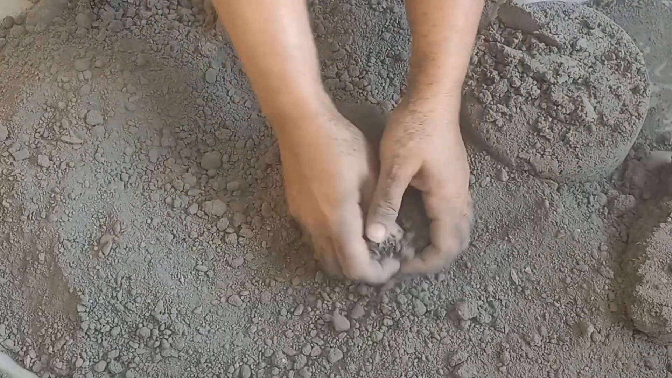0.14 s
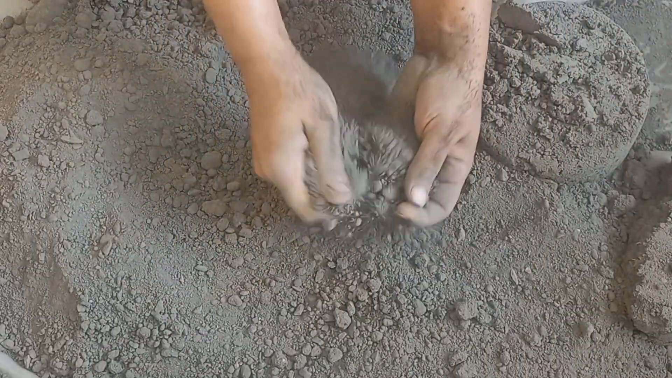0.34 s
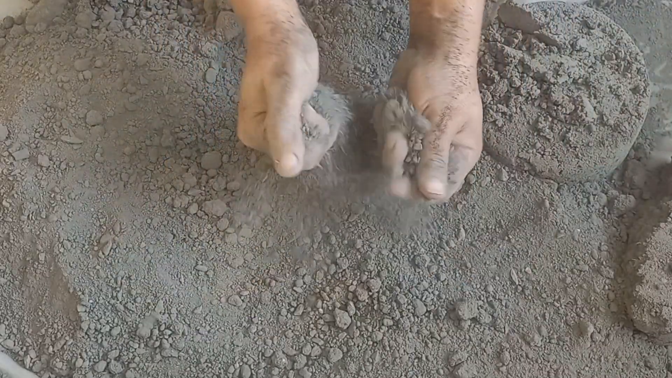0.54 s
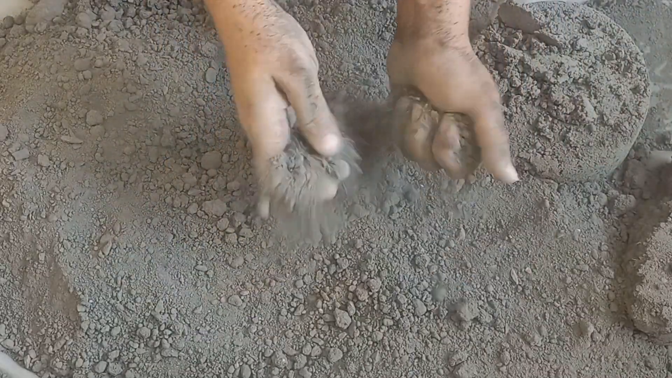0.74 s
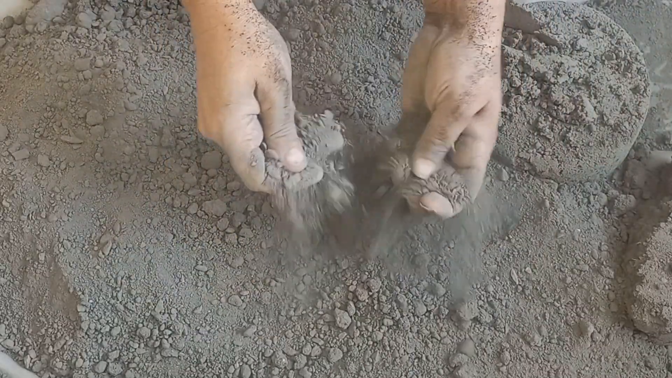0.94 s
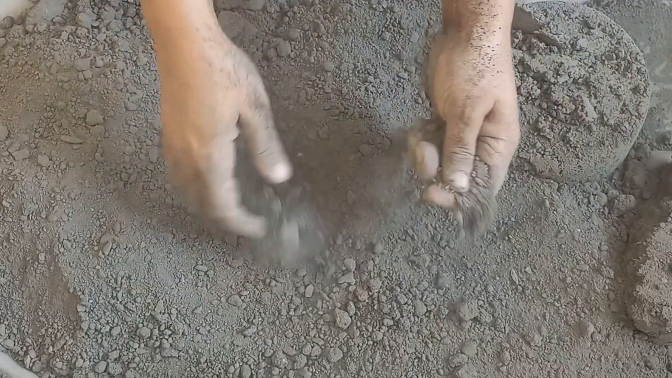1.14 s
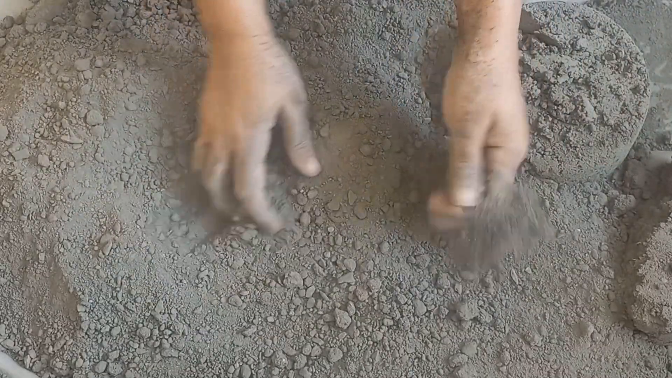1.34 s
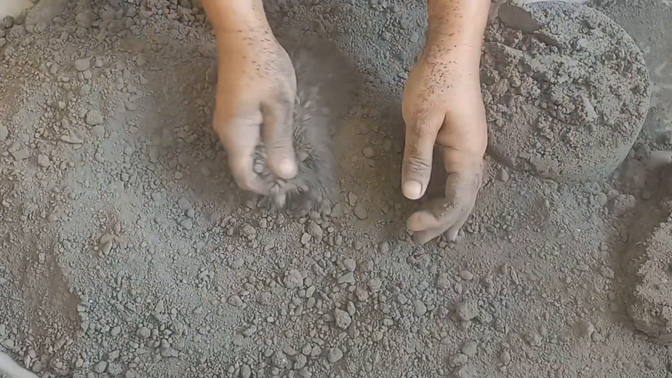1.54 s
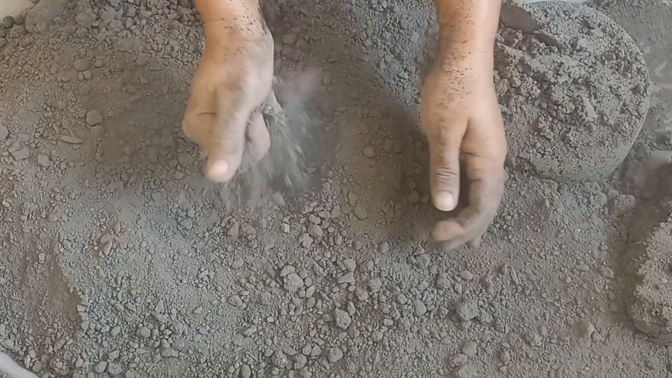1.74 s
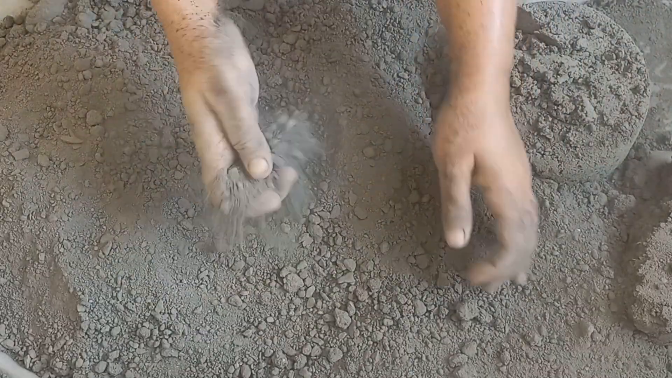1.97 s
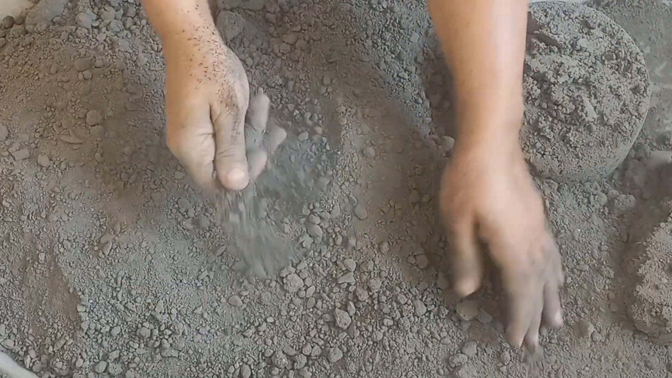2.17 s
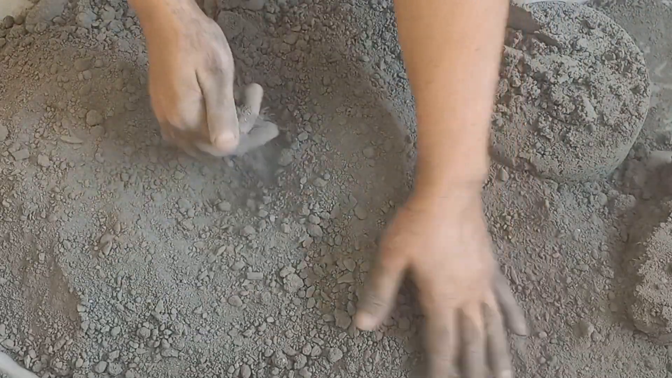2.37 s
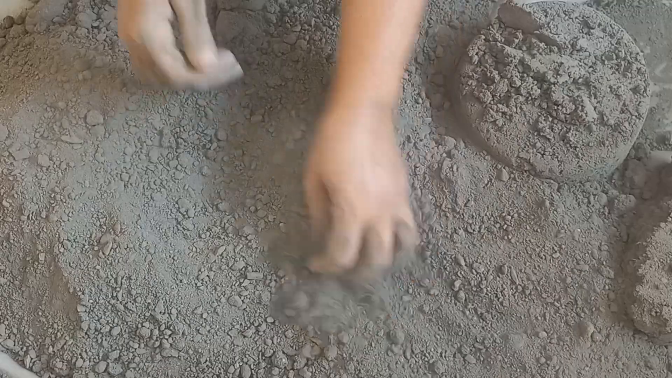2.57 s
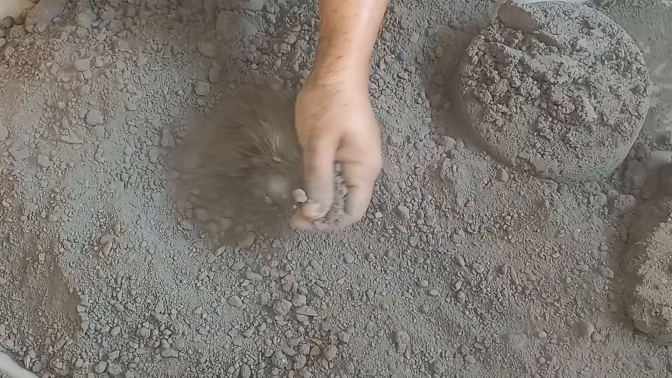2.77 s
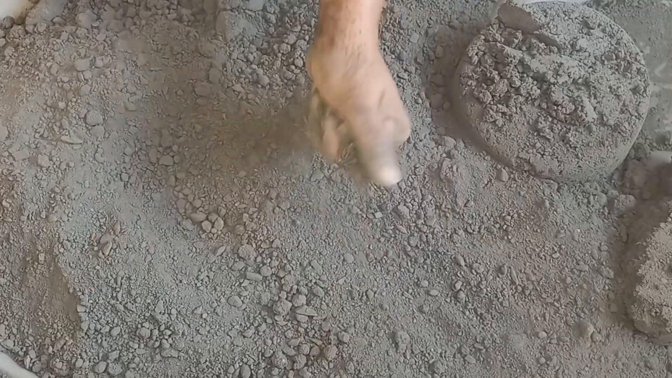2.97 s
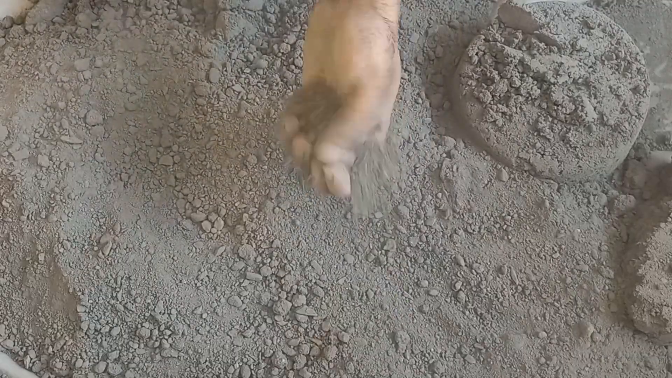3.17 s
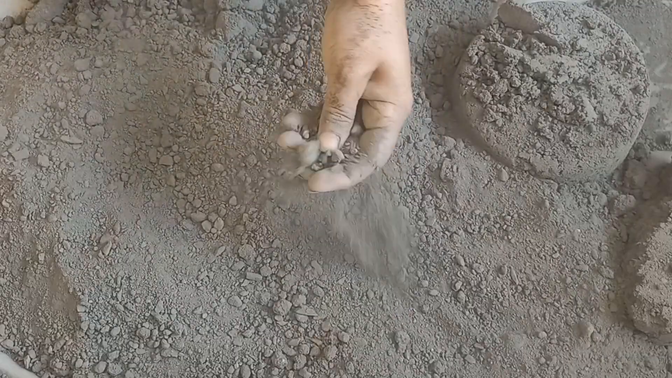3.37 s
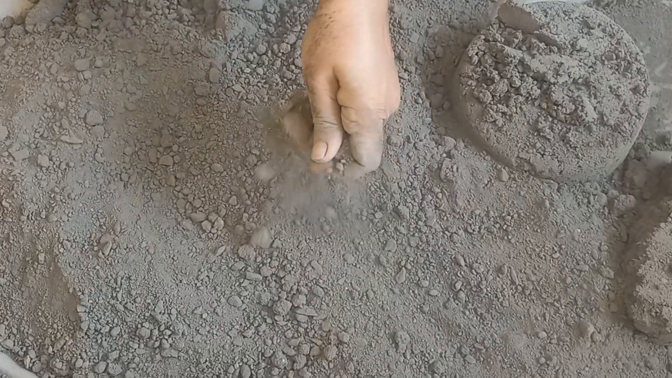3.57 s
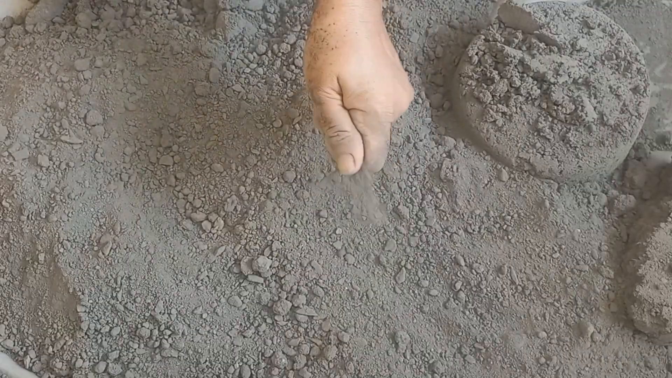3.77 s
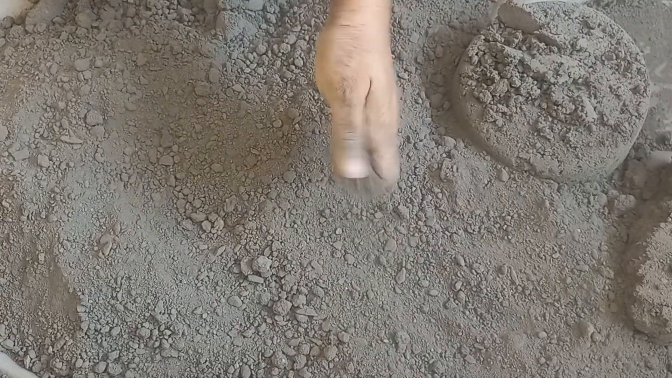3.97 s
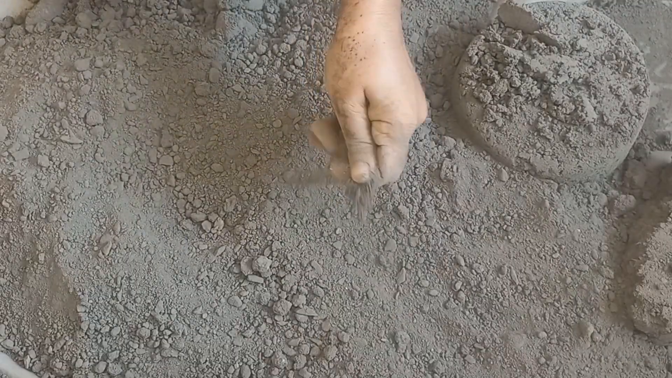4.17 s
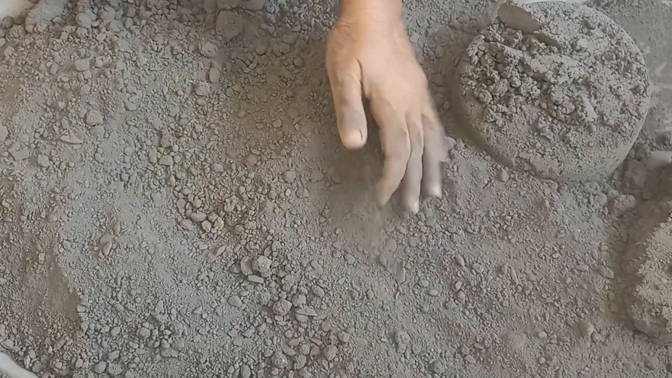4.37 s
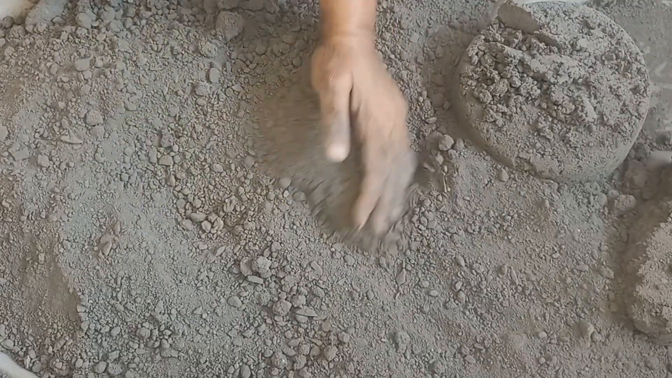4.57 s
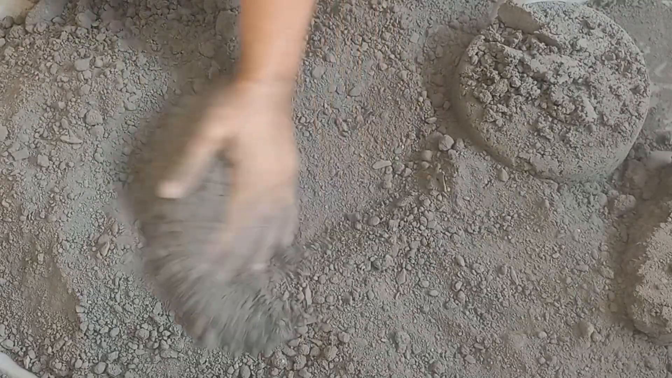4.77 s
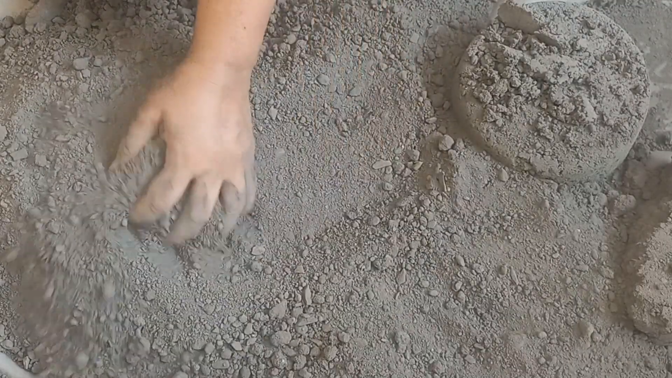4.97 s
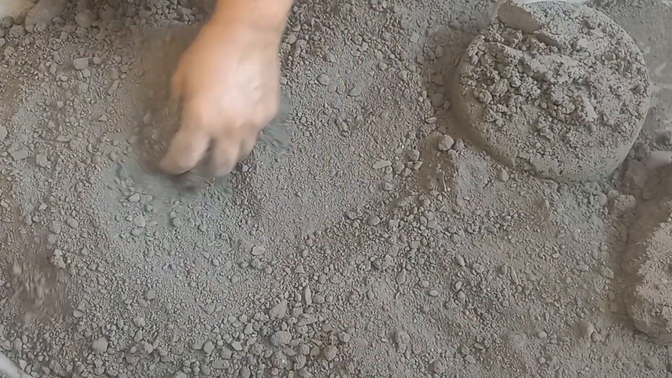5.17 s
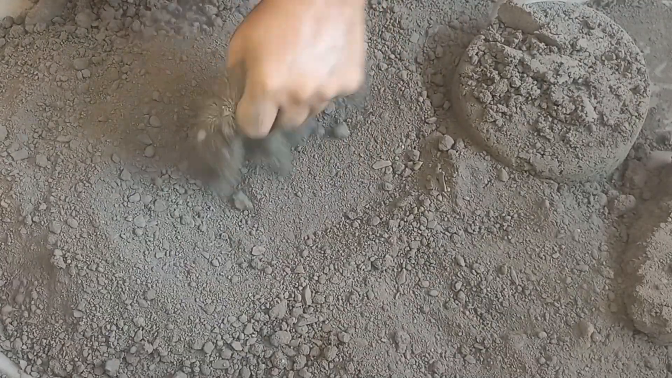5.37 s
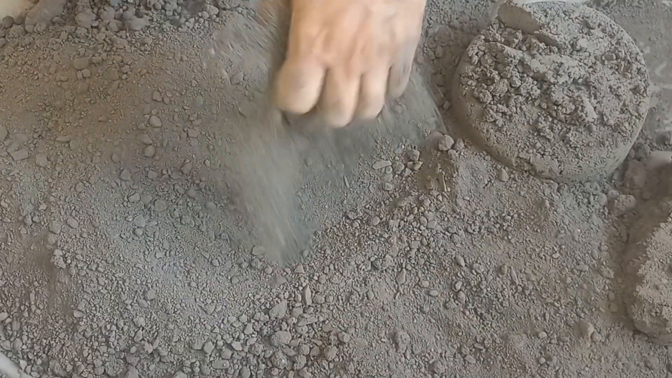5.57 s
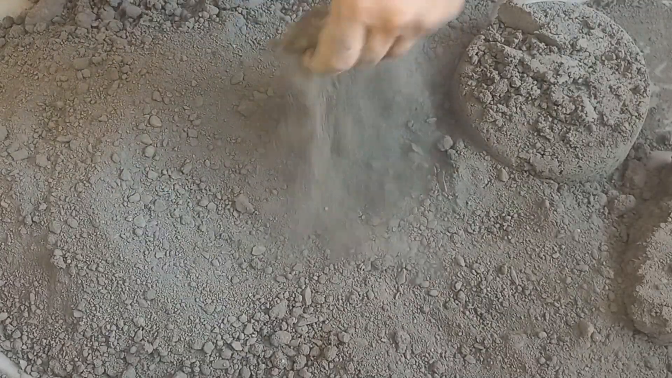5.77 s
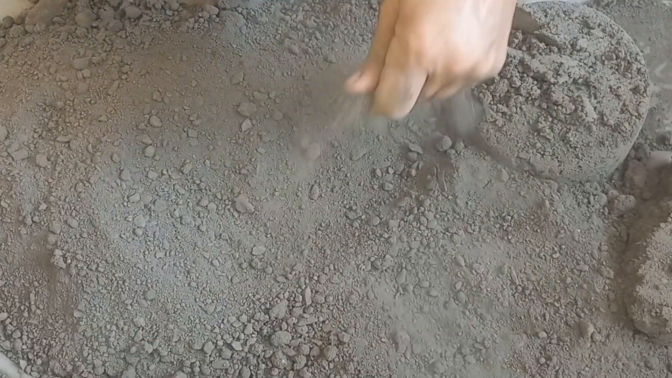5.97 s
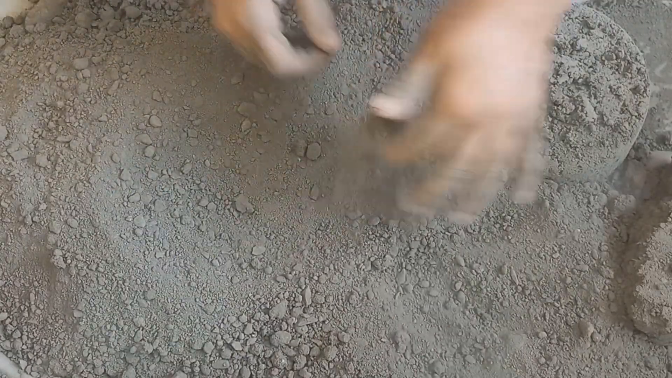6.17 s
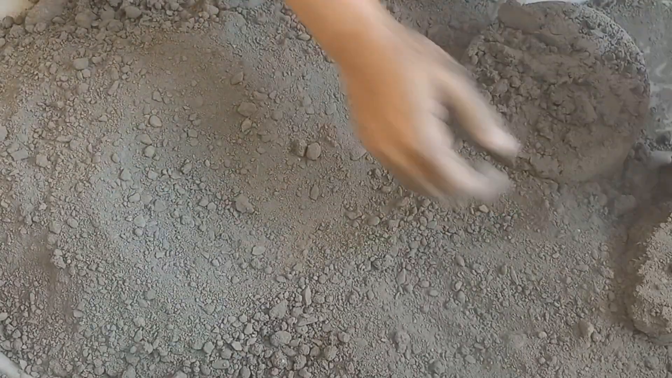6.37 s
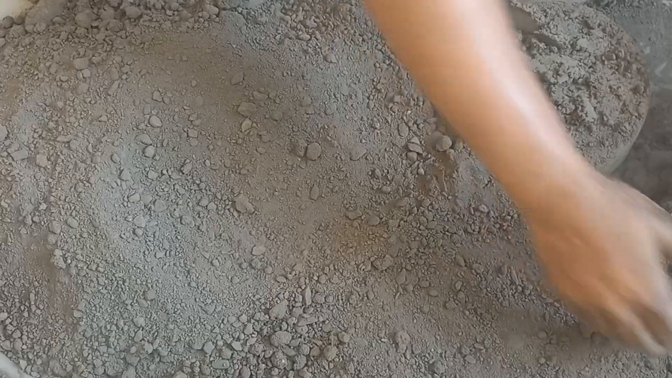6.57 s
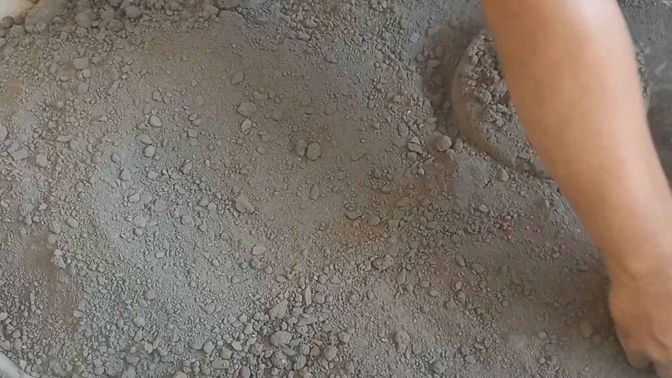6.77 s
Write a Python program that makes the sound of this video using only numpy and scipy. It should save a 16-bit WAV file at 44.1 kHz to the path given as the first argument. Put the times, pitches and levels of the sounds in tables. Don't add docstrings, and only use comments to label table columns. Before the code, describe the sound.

Bare hands dig into dry, dusty lumps with a scraping hiss, then rub and crush them, crumbs crunching in the palm, small pieces snapping and grit raining down. The middle grows thinner, with isolated crackles and squeezes. A rougher scoop with low knocks follows, then a falling handful, near quiet and a last short scrape. Close small microphone, very dry small space, faint hum and hiss.

```python
import sys
import numpy as np
from scipy import signal
from scipy.fft import rfft, irfft, next_fast_len
from scipy.io import wavfile
from scipy.ndimage import uniform_filter1d

SR = 44100
rng = np.random.default_rng(int(sys.argv[2]) if len(sys.argv) > 2 else 0)


def transcribe(signal):
    frames = np.atleast_2d(signal).T
    limited = np.clip(frames, -1, 1)
    pcm = np.round(limited * 32767).astype(np.int16)
    wavfile.write(sys.argv[1], SR, pcm)


def gain_from_decibels(decibels):
    exponent = np.asarray(decibels, float) / 20
    return 10 ** exponent


N = 301203

# frequency in Hz, level in dB per Hz.
BACKGROUND_SPECTRUM = [(20, -72), (40, -42), (60, -19), (80, -17), (130, -7), (170, -6.5), (240, -17.5),
                       (400, -18), (600, -62), (3500, -46), (3800, -37.5), (7000, -31), (15500, -35.5)]
# frequency in Hz, width of its waver in Hz, level in dB.
MAINS_HUM = (100.4, 12.4, -50.5)
# frequency in Hz, level in dB.
HUM_PARTNERS = [(78, -61), (131, -59), (201, -60)]
# frequency in Hz, gain in dB.
MICROPHONE = [(25, -45), (45, -25), (65, 0), (120, -4), (1650, 0.5), (1950, 3.5), (2350, 5), (6000, -3.5),
              (15000, -6.5)]
# frequency in Hz, side minus mid in dB.
SIDE_COLOUR = [(60, -54), (110, -42), (200, -47), (380, -21), (700, -38), (1290, -64), (2380, -48),
               (4400, -45), (8120, -34.5), (15000, -32)]

# spread of ring in octaves, cycles of ring, grains per second, size spread in dB,
# share of wide ticks from 0 to 1.
HEAP_GRAINS = (.7, 0.55, 1300, 2.2, 0.23)
LUMP_GRAINS = (.43, 1.2, 2600, 1.5, 0.32)
CRUMB_GRAINS = (.3, 2.8, 3300, 3.7, .25)
GRIT_GRAINS = (0.45, 0.48, 8000, 2.3, 0.2)
RINGS_HZ = np.geomspace(110, 18000, 30)

# peak in seconds, rise in seconds, fall in seconds, effort in dB, ring of the lumps in Hz.
SCOOPS = [(.06, 0.1, 0.12, -31.5, 885), (.18, .1, 0.07, -34.5, 850), (0.781, 0.092, 0.1, -37, 1024),
          (1.245, .015, 0.056, -43.5, 480), (1.376, 0.076, 0.13, -33, 895), (2.601, 0.15, 0.11, -32.5, 900),
          (3.02, 0.079, 0.11, -37.5, 900), (3.168, 0.044, 0.082, -46.5, 840),
          (4.622, 0.13, 0.41, -37.5, 723), (4.811, 0.18, 0.08, -32.5, 880), (5.03, 0.06, 0.28, -32.5, 1110),
          (5.139, 0.11, 0.12, -31.5, 923), (5.25, 0.081, 0.12, -41.5, 950), (5.77, 0.049, 0.08, -39.5, 800),
          (6.781, 0.058, 0.052, -37, 1330)]
# peak in seconds, rise in seconds, fall in seconds, effort in dB, lumps in the hand in dB.
RUBS = [(.03, 0.12, 0.071, -31, -6.5), (0.358, 0.059, 0.39, -30, -7.5), (.72, 1, 0.11, -32, -6.5),
        (1.07, 0.19, 0.39, -35, -7), (1.27, 0.037, 0.1, -36.5, -7), (1.69, 0.18, 0.067, -28, -7.5),
        (1.75, 0.077, 0.24, -32.5, -5.5), (2.22, 0.12, 0.12, -32, -11), (2.58, 0.17, 0.11, -31, -19),
        (2.991, 0.26, 0.15, -31, -13), (3.36, 0.069, 0.3, -40, -13), (3.5, 0.017, 0.078, -41, -23),
        (3.7, 0.22, 0.47, -39.5, -20), (3.901, 0.16, 0.083, -33.5, -22), (4.15, 0.12, 0.25, -40, -10),
        (4.262, 0.053, 0.014, -31.5, -14), (4.8, 0.15, 0.23, -35.5, -11.5), (5.03, 0.088, 0.21, -36, -4.5),
        (5.42, 0.16, 0.18, -35.5, -4), (5.765, 0.037, 0.13, -35.5, -10), (5.95, 0.088, 0.06, -36, -13),
        (6.07, 0.015, 0.13, -36, -12.5), (6.2, 0.16, 0.15, -49, 0), (6.78, 0.028, 0.052, -39, 1)]
# peak in seconds, rise in seconds, fall in seconds, effort in dB, ring in Hz.
CRUNCHES = [(0.348, 0.14, 0.25, -36, 4890), (.72, 0.35, 0.26, -50, 3400), (1.688, 0.057, 0.23, -36, 4380),
            (2.18, 0.11, 0.07, -35.5, 4100), (2.25, 0.1, 0.042, -37, 3940), (2.99, 0.11, 0.17, -40, 3350),
            (3.62, .1, .1, -58, 3500), (3.51, 0.018, 0.024, -46, 4600), (3.78, 0.019, 0.033, -47, 2840),
            (3.88, 0.26, 0.047, -62, 3670), (4.258, 0.15, .015, -46.5, 3400),
            (5.42, 0.21, 0.063, -44, 3650), (5.949, 0.017, 0.043, -41.5, 4460),
            (6.079, 0.026, 0.042, -44, 2800), (6.73, 0.045, 0.058, -53, 1920)]
# time in seconds, level in dB.
TRICKLE = [(0, -42), (.2, -45), (.92, -41.5), (1.5, -43), (2.03, -45.5), (2.38, -44), (2.8, -45.5),
           (3.25, -47), (3.5, -45), (4.0, -48.5), (4.36, -45.5), (4.5, -50), (5.6, -41.5), (5.88, -45.5),
           (6.0, -44.5), (6.27, -44), (6.36, -55.5), (6.68, -56.5), (6.83, -42)]
# time in seconds, closure from 0 to 1.
CLOSURE = [(0, 0.2), (.3, 0.67), (.8, 0.61), (1.25, 0.6), (1.55, 0.47), (2.35, 0.44), (2.5, 0), (2.8, 0.47),
           (3.1, 0), (3.4, 0.69), (4.5, 0.69), (4.6, 0.07), (5.3, 0.01), (5.5, 0.96), (5.75, 0.32),
           (5.9, 0.25), (6.35, 0.72), (6.6, 0.2)]

# time in seconds, level in dB, ring in Hz, length in ms.
SCRAPES = [(0.049, -43, 920, 15), (0.368, -39, 1370, 31), (0.546, -39, 1310, 37), (1.097, -40, 1210, 19),
           (1.264, -46, 900, 22), (1.359, -38, 950, 52), (1.396, -36, 1000, 24), (1.633, -40, 1290, 27),
           (1.656, -41, 1040, 9), (1.745, -36.5, 990, 26), (2.274, -40, 890, 11), (2.288, -42.5, 1050, 8.4),
           (2.564, -39, 815, 30), (2.591, -33, 850, 43), (2.977, -31, 900, 14), (3.021, -37, 644, 11),
           (3.063, -33.5, 860, 17), (3.62, -50, 760, 11), (3.757, -43, 1320, 10), (3.874, -45, 1360, 14),
           (4.131, -51, 1120, 17), (4.188, -45, 1360, 21), (4.244, -41, 1190, 17), (4.262, -41, 1280, 14),
           (4.561, -38, 824, 26), (4.602, -38, 776, 51), (4.784, -43, 1020, 27), (4.804, -45, 700, 34),
           (5.117, -30.5, 830, 40), (5.343, -40, 1020, 18), (5.747, -43, 740, 27), (5.78, -43, 764, 12),
           (5.805, -59, 674, 19), (5.958, -52, 1100, 11), (5.974, -51, 820, 17), (6.076, -47.5, 870, 18),
           (6.257, -40.5, 726, 8.5), (6.761, -36.5, 1420, 29), (6.773, -51, 1290, 28),
           (6.795, -42, 1310, 21)]
# time in seconds, level in dB, ring in Hz, length in ms.
GRINDS = [(.704, -38, 3420, 32), (.967, -43.5, 3480, 39), (1.699, -33, 4850, 12), (2.203, -29.5, 4240, 8.3),
          (2.222, -37, 4200, 12), (2.238, -32, 4000, 6), (1.375, -37.5, 1860, 66), (2.6, -41, 2700, 21),
          (2.971, -35, 3240, 23), (3.518, -38, 2820, 3.5), (3.783, -44, 2860, 12), (3.87, -38.5, 3100, 7.1),
          (3.914, -42, 3000, 6.6), (4.026, -60.5, 2960, 3), (4.188, -39, 3600, 15), (4.264, -43, 3160, 12),
          (4.78, -37, 3020, 21), (5.951, -39, 3450, 21), (6.804, -35, 2520, 9.2)]
# time in seconds, peak in dB, centre in Hz.
SNAPS = [(.4952, -15, 7340), (.7175, -14, 4500), (.7207, -17, 5610), (1.1633, -13, 5200),
         (1.235, -10, 4500), (1.375, -9, 7460), (1.6295, -14, 4290), (1.6997, -14, 7830),
         (2.111, -16, 7620), (2.142, -16, 3700), (2.157, -18, 5890), (2.1741, -12, 6550),
         (2.1798, -10, 5020), (2.2485, -17, 5150), (2.2884, -18, 6320), (3.0704, -18, 6560),
         (3.1821, -20, 4840), (3.3404, -20, 6380), (3.5104, -13, 7150), (3.569, -20, 8170),
         (3.652, -14, 3800), (3.7154, -12, 5320), (3.7223, -19, 5980), (3.7551, -13, 5560),
         (3.8449, -11, 3600), (4.1728, -16, 5380), (5.2188, -20, 4340), (5.3427, -15, 4500),
         (5.9282, -13, 6750), (5.9718, -13, 4680),
         (.5095, -11, 10990), (.5675, -17, 10390), (.6304, -15, 12710), (.6628, -18, 9510),
         (.7492, -14, 9240), (.9008, -17, 10170), (.9566, -16, 12410), (.9651, -15, 10800),
         (1.0059, -16, 9650), (1.0646, -16, 9680), (1.0938, -19, 8890), (1.1993, -14, 10580),
         (1.8575, -17, 9000), (2.0624, -22, 12390), (2.1211, -11, 12480), (2.2426, -11, 10010),
         (2.3317, -21, 11390), (2.9527, -17, 11860), (2.9619, -15, 11250), (3.3517, -21, 12600),
         (3.4047, -16, 10980), (3.6876, -22, 9640), (3.8407, -17, 10880), (3.9288, -18, 11110),
         (4.006, -24, 11750), (4.0538, -20, 13000), (4.0868, -24, 11810), (4.3269, -9, 10700),
         (4.3533, -19, 12110), (4.397, -25, 11220),
         (4.8252, -16, 10900), (5.5039, -19, 9410), (5.5805, -23, 8420), (5.5959, -21, 11860),
          (5.6632, -22, 10220), (5.7035, -21, 11260), (5.7307, -20, 11610), (5.7446, -16, 6490),
          (5.7595, -9, 12500), (5.7617, -14, 11620), (5.7784, -18, 8240), (5.8319, -22, 10180),
          (5.8834, -23, 9030), (5.8914, -19, 5440), (6.03, -27, 10930), (6.0677, -23, 9420),
          (6.0883, -21, 7230), (6.1408, -22, 5370), (6.1627, -26, 5240), (6.1704, -23, 9810),
          (6.1834, -18, 6950), (6.2001, -19, 8410), (6.2567, -18, 8420), (6.2605, -19, 9250),
          (6.2848, -27, 7160), (6.325, -31, 6000), (4.8199, -20, 9570), (4.9156, -23, 11320),
         (0.3103, -19, 4860), (0.3337, -18, 5180), (0.5034, -18, 6380), (0.7056, -17, 3950),
            (0.7663, -18, 4010), (0.8368, -22, 10920), (0.8723, -23, 12400), (0.9177, -24, 13200),
            (1.0835, -21, 7770), (1.1529, -19, 10890), (1.3542, -22, 5880), (1.3841, -19, 5700),
            (1.9683, -26, 12940), (1.9738, -26, 7890), (2.0531, -25, 12260), (2.1638, -23, 4220),
            (2.4173, -25, 7630), (2.4202, -24, 5900), (2.5502, -18, 11610), (2.8525, -25, 5560),
            (2.8705, -26, 5460), (2.9418, -19, 4930), (3.1399, -26, 9700), (3.1473, -29, 12480),
            (3.1581, -26, 7700), (3.1745, -27, 12470), (3.2955, -28, 7960), (3.4095, -23, 9630),
            (3.4404, -24, 10230), (3.4417, -24, 7330), (3.4442, -27, 6600), (3.4928, -23, 7320),
            (3.535, -26, 4900), (3.6125, -26, 8340), (3.617, -19, 11000), (3.618, -25, 10730),
            (3.6402, -24, 6160), (3.6936, -25, 10610), (3.6946, -24, 7250), (3.7101, -23, 7330),
            (3.7293, -24, 4000), (3.856, -20, 10990), (3.8677, -21, 4400), (4.0705, -32, 9040),
            (4.1266, -25, 13510), (4.1496, -29, 4160), (4.1892, -19, 5140), (4.2396, -18, 8520),
            (4.2411, -17, 6970), (4.3341, -26, 4940), (4.3581, -26, 13000), (4.3628, -27, 10630),
            (4.9532, -24, 11090), (4.9565, -28, 4200), (4.9922, -25, 4920), (4.9966, -19, 7690),
            (5.0528, -19, 3820), (5.058, -17, 5820), (5.1179, -22, 4540), (5.1413, -23, 4950)]
# time in seconds, level in dB, centre in Hz, length in ms.
CRUSHES = [(0.389, -23, 8400, 2.8), (0.444, -29.5, 6500, 18), (0.76, -29, 6990, 12), (1.261, -31, 7270, 24),
           (1.969, -43, 10350, 3.8), (2.203, -28.5, 6620, 7.1), (2.269, -30, 8250, 7.5),
           (2.34, -36, 10000, 8.5), (2.417, -46, 8400, 7.6), (3.443, -34, 8640, 3.4),
           (3.498, -27, 8040, 7.2), (3.541, -33.5, 7500, 6.2), (3.615, -33, 12100, 5.9),
           (3.65, -37, 8620, 21), (3.757, -22.5, 7840, 6.6), (3.778, -33, 7920, 21),
           (3.845, -20, 6100, 1.9), (4.128, -37, 9900, 5.5), (4.191, -34.5, 6650, 22),
           (4.242, -26.5, 9100, 14), (4.327, -32, 9900, 2.5), (4.956, -41, 6720, 3.4),
           (5.034, -31, 4120, 1.8), (5.761, -34, 11700, 10), (5.835, -36, 9360, 4.9),
           (5.971, -27, 5240, 1.5), (6.046, -30.5, 4130, 1.7), (6.077, -35.5, 5700, 6.9),
           (6.257, -32.5, 8340, 3.3), (2.18, -25.5, 5200, 2.8), (3.896, -34, 10500, 13),
           (.376, -32, 8000, 23), (6.802, -40, 3700, 7.1)]
# time in seconds, peak in dB, ring in Hz.
KNOCKS = [(0.7667, -22.5, 990), (1.0833, -24, 756), (1.235, -21, 670), (1.653, -36, 1070),
          (1.902, -23.5, 1020), (1.969, -33, 730), (2.245, -24, 1010), (3.0159, -23, 660),
          (3.1831, -20.5, 870), (3.341, -26.5, 840), (3.3713, -27.5, 775), (3.755, -43, 810),
          (4.243, -30, 1180), (4.9973, -14.5, 766), (5.03, -15, 1000), (5.034, -15, 900), (5.059, -17, 850),
          (5.3647, -23.5, 685), (5.7629, -19.5, 736), (5.7822, -40, 770), (6.235, -32, 680),
          (0.698, -20, 940), (5.973, -27.5, 1700), (6.077, -22, 1820), (5.744, -27, 900)]
# time in seconds, peak in dB, ring in Hz.
THUDS = [
    (1.237, -30, 225),
    (1.246, -29, 170),
    (1.26, -29, 190),
    (1.369, -25.5, 204),
    (2.599, -33, 159),
    (5.765, -27, 245),
]


def evened(x):
    return x / np.sqrt(np.mean(x ** 2) + 1e-20)


def add(mix, s, sound):
    part = mix[round(s * SR):][:len(sound)]
    part += sound[:len(part)]


def curves(table):
    s, *columns = np.transpose(table)
    return [np.interp(np.arange(N) / SR, s, c) for c in columns]


def closed():
    return np.clip(curves(CLOSURE)[0], 0, 1)


def coloured(x, points):
    size = next_fast_len(N)
    table_hz, table_db = np.transpose(points)
    hz = np.fft.rfftfreq(size, 1 / SR)
    gain_db = np.interp(np.log(hz + 1), np.log(table_hz + 1), table_db)
    return irfft(rfft(x, size) * gain_from_decibels(gain_db), size)[:N]


def drift(ms):
    width = max(round(ms * SR / 1000), 2)
    once = uniform_filter1d(rng.standard_normal(N), width)
    return evened(uniform_filter1d(once, width))


def resonate(x, hz, width_hz):
    turn = np.exp(2j * np.pi * np.cumsum(hz * np.ones(N)) / SR)
    r = np.exp(-np.pi * width_hz / SR)
    return 2 * (turn * signal.lfilter([1 - r], [1, -r], x / turn)).real


def ring(hz, cycles):
    turns = np.arange(1, 1200) * hz / SR
    x = np.sin(2 * np.pi * turns) * turns * np.exp(-2.5 * turns / max(cycles, .5))
    return x / np.linalg.norm(x)


def crack(hz, octaves):
    f = abs(np.fft.fftfreq(512, 1 / SR)) + 1
    hump = -(np.log2(f / hz) / (2 * max(octaves, .2))) ** 2
    log_gain = np.maximum(hump - 0.15 * np.log(f / hz), -8)
    x = np.fft.ifft(np.exp(np.conj(signal.hilbert(log_gain)))).real[:256]
    return x / abs(x).max()


def swell(t, ms):
    rate = np.where(t < 0, 1900, 1300)
    return np.exp(-abs(rate * t / ms) ** np.where(t < 0, 3, 1.8))


def background():
    hz, width_hz, hum_db = MAINS_HUM
    waver = resonate(resonate(rng.standard_normal(N), hz, width_hz), hz, 3 * width_hz)
    hum = evened(np.sin(2 * np.pi * hz * np.arange(N) / SR) + .5 * evened(waver))
    noise = evened(coloured(rng.standard_normal(N), BACKGROUND_SPECTRUM))
    partners = sum(gain_from_decibels(db) * evened(resonate(rng.standard_normal(N), f, 4)) for f, db in HUM_PARTNERS)
    return partners + gain_from_decibels(hum_db) * hum + gain_from_decibels(-50 + .5 * drift(120)) * noise


def moves(table):
    slope_db = 12
    roundness = 1.59
    peak, rise, fall, db, _ = np.transpose(table)[:, :, None]
    late = np.arange(0, N, 100) / SR - peak
    distance = np.maximum(-late / np.maximum(rise, .005), late / np.maximum(fall, .005))
    return gain_from_decibels(2 * (db - slope_db * distance ** roundness))


def hands():
    scoops, rubs, crunches = moves(SCOOPS), moves(RUBS), moves(CRUNCHES)
    scoop, rub = scoops.sum(0), rubs.sum(0)
    trickle = gain_from_decibels(2 * curves(TRICKLE)[0][::100])

    dug_hz = np.array(SCOOPS)[:, -1]
    pushed_db = -2 - 8.5 * np.log2(dug_hz / 900)
    heap = gain_from_decibels(2 * pushed_db) @ scoops + gain_from_decibels(2 * -44) * rub + gain_from_decibels(2 * -5.5) * trickle

    held = gain_from_decibels(2 * np.array(RUBS)[:, 4]) @ rubs
    fallen = gain_from_decibels(2 * -21.5) * trickle
    lumps = scoop + held + fallen
    lumps_hz = (dug_hz @ scoops + 1119 * held + 800 * fallen) / lumps

    dug = gain_from_decibels(2 * -9.5) * scoop
    loose = gain_from_decibels(2 * -21) * rub + gain_from_decibels(2 * -27) * trickle
    crumbs = dug + loose + crunches.sum(0)
    crumbs_hz = (3030 * dug + 3980 * loose + np.array(CRUNCHES)[:, 4] @ crunches) / crumbs

    rubbed_grit_hz, dug_grit_hz = 9580, 6500
    dug_grit = gain_from_decibels(2 * -6) * scoop
    grit = dug_grit + rub + trickle
    grit_hz = rubbed_grit_hz - (rubbed_grit_hz - dug_grit_hz) * dug_grit / grit

    gains = np.sqrt([heap, lumps, crumbs, grit])
    full = [np.interp(np.arange(N), np.arange(0, N, 100), c)
            for c in (*gains, lumps_hz, crumbs_hz, grit_hz)]
    return full[:4], full[4:]


def clicks(per_s, spread_db):
    struck = rng.random(N) < per_s / SR
    size = rng.exponential(1, N)
    sign = rng.choice([-1., 1.], N)
    return evened(struck * sign * gain_from_decibels(spread_db * np.minimum(size, 5)))


def slips(ms):
    starts = rng.exponential(1, N) * (rng.random(N) < 60 / SR)
    release = signal.lfilter([1], [1, -np.exp(-1000 / (ms * SR))], starts)
    return evened(np.minimum(release, 3) - np.mean(release))


def grains(kind, centre_hz, ticks):
    octaves, cycles, per_s, spread_db, share = kind
    share = np.clip(share, 0, 1)
    contacts = clicks(per_s, spread_db)
    grain_hz = centre_hz * 2 ** (octaves * np.clip(rng.standard_normal(N), -2, 2))
    which = np.searchsorted(RINGS_HZ, grain_hz)
    single = sum(signal.oaconvolve(contacts * (which == k), ring(hz, cycles))[:N]
                 for k, hz in enumerate(RINGS_HZ) if (which == k).any())
    colour = rng.integers(0, 3, N)
    middle_hz = np.mean(centre_hz)
    wide = sum(signal.oaconvolve(ticks * (colour == k), crack(factor * middle_hz, octaves))[:N]
               for k, factor in enumerate((.9, 1.25, 1.7)))
    return evened(np.sqrt(1 - share) * evened(single) + np.sqrt(share) * evened(wide))


def crumbling():
    ticks = clicks(600, 2.6)
    gains, (lumps_hz, crumbs_hz, grit_hz) = hands()
    shared = .8 * slips(7) + np.clip(.35 * drift(25), -1, 1)
    kinds = (HEAP_GRAINS, LUMP_GRAINS, CRUMB_GRAINS, GRIT_GRAINS)
    rings_hz = (288, lumps_hz, crumbs_hz, grit_hz)
    depths = (0.69, 0.83, 0.17, 0.8)
    layers = []
    for kind, hz, depth, gain in zip(kinds, rings_hz, depths, gains):
        clumps = evened(gain_from_decibels(2.2 * (depth * shared + .3 * drift(20))))
        layers.append(gain * clumps * grains(kind, hz, ticks))
    return layers


def drags(table, cycles):
    out, t = np.zeros(N), np.arange(-1800, 2600) / SR
    chances = rng.standard_normal((len(table), 2, len(t)))
    for (s, db, hz, ms), (a, b) in zip(table, chances):
        run = evened(signal.oaconvolve(a * b ** 2, ring(hz, cycles))[:len(t)])
        start = s + t[0]
        skip = max(round(-start * SR), 0)
        add(out, max(start, 0), (gain_from_decibels(db) * run * swell(t, ms))[skip:])
    return out


def snaps():
    out, t = np.zeros(N), np.arange(200) / SR
    small_hz = 9500
    breaks = SNAPS
    chances = rng.standard_normal((len(breaks), len(t)))
    for (s, db, hz), chance in zip(breaks, chances):
        octaves = .55 * min(small_hz / hz, 1) ** 1.5
        blows = (t == 0) + .13 * chance * np.exp(-t / .001)
        snap = np.convolve(blows, crack(1.01 * hz, 1.25 * octaves))
        peak_db = db + 1.8 + 2.5 * (hz > small_hz)
        add(out, s - .0001, gain_from_decibels(peak_db) * snap / abs(snap).max())
    return out


def crushes():
    out, t = np.zeros(N), np.arange(-900, 900) / SR
    chances = rng.standard_normal((len(CRUSHES), 2, len(t)))
    for (s, db, hz, ms), (a, b) in zip(CRUSHES, chances):
        spray = evened(np.convolve(a * abs(b), crack(hz, 0.94), "same"))
        add(out, s + t[0], gain_from_decibels(db + 2.5) * spray * swell(t, ms))
    return out


def knocks():
    out = np.zeros(N)
    for s, db, hz in KNOCKS:
        knock = ring(hz, 0.91) - 0.14 * ring(0.22 * hz, 1.0)
        add(out, s - .0008, gain_from_decibels(db) * knock / abs(knock).max())
        add(out, s - .0002, gain_from_decibels(db - 3.5) * crack(2470, 0.51))
    return out


def thuds():
    out = np.zeros(N)
    for s, db, hz in THUDS:
        push = ring(hz, 1.37)
        add(out, s, gain_from_decibels(db) * push / abs(push).max())
    return out


def fist(x):
    slit_hz, slit_width_hz, hollow_width_hz = 2720, 380, 1500
    _, (_, hollow_hz, _) = hands()
    closure = closed()
    held = signal.sosfilt(signal.butter(5, 0.81 * slit_hz, "high", fs=SR, output="sos"), x)
    hollow = .8 * resonate(held, hollow_hz, hollow_width_hz)
    held = held + hollow + 1.7 * resonate(held, slit_hz, slit_width_hz)
    return np.sqrt(1 - closure) * x + np.sqrt(closure) * 0.66 * held


def shaded(x):
    closure = closed()
    bounce = .4 * closure
    x = (x + bounce * np.roll(x, 12)) / np.sqrt(1 + bounce ** 2)
    gap_hz, gap_width_hz, gap_depth = 1850, 500, .5
    return x - gap_depth * closure * resonate(x, gap_hz, gap_width_hz)


def room(x):
    level_db, t60_s = -22, .05
    t = np.arange(6000) / SR
    tail = rng.standard_normal(len(t)) * gain_from_decibels(-60 * t / t60_s) * (t > .002)
    return x + signal.oaconvolve(x, gain_from_decibels(level_db) * tail / np.linalg.norm(tail))[:N]


def scene():
    heap, lumps, crumbs, grit = crumbling()
    cracks = snaps()
    low = heap + lumps + knocks() + thuds()
    dragging = drags(SCRAPES, 2.3) + drags(GRINDS, 1.64)
    escaping = (.5 - .3 * closed()) * cracks
    in_hand = fist(crumbs + grit + crushes() + 0.69 * cracks)
    near = low + dragging + escaping + in_hand
    mid = coloured(room(shaded(near)), MICROPHONE) + background()
    wander = np.sign(drift(20)) * gain_from_decibels(8 * np.clip(drift(45), -2, 2))
    side = coloured(mid * wander, SIDE_COLOUR)
    return np.array([mid + side, mid - side])


def low_pass(x):
    return signal.sosfilt(signal.butter(12, 16860, fs=SR, output="sos"), x)


def record(dry):
    edge = signal.firwin(401, 15800, window=("kaiser", 5), fs=SR)
    mix = signal.oaconvolve(dry, edge[None], "same")
    return low_pass(mix)


dry = scene()
out = record(dry)
transcribe(out)
```